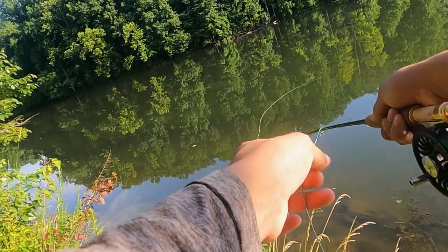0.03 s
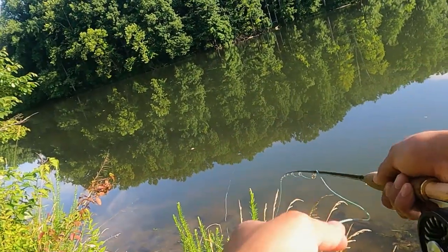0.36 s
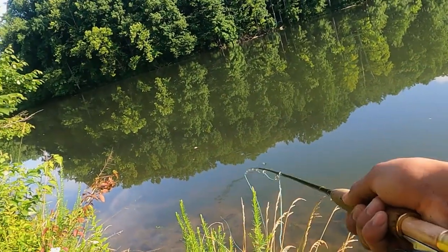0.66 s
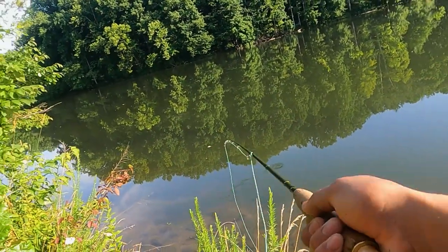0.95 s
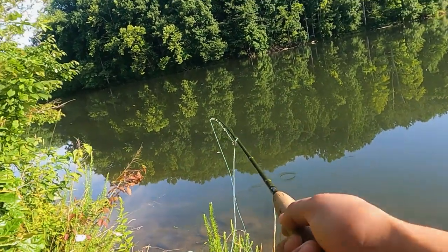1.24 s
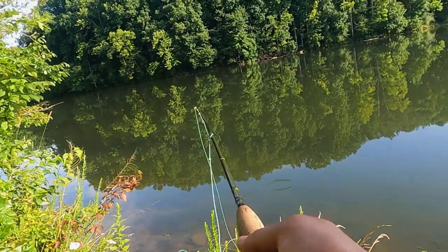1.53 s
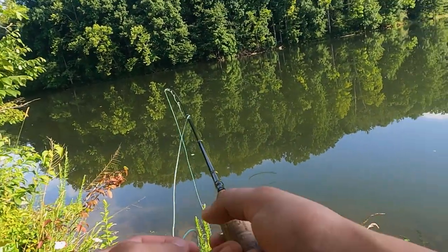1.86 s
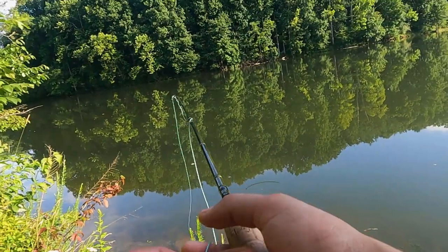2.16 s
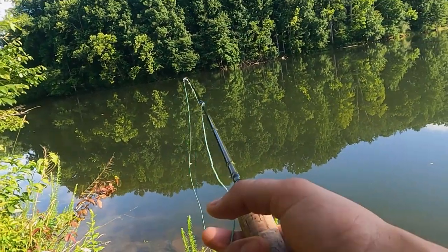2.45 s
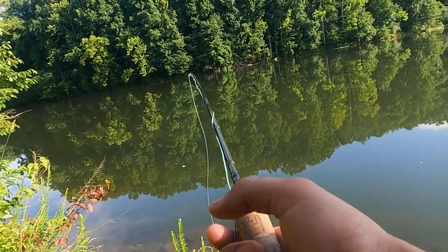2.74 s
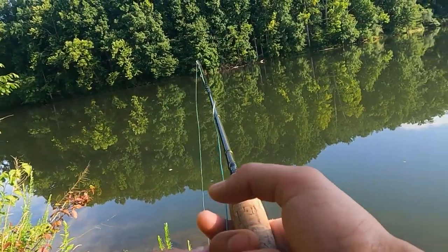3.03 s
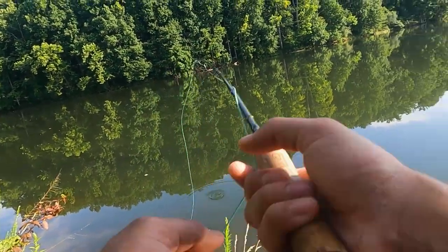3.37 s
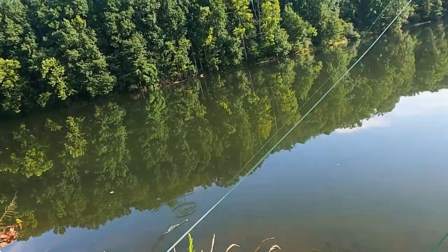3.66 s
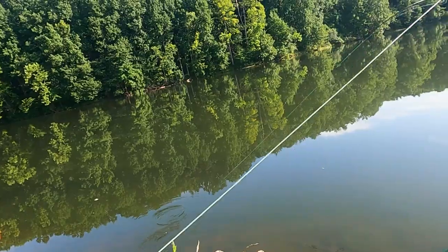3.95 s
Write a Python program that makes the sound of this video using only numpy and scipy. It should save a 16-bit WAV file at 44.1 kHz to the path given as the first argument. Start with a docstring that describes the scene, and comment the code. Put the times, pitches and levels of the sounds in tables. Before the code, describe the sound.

A fishing rod clicks and its line zips out in a cast, over low rumble.

```python
"""Fly rod cast on a lake shore

The line rasps through the rod's guides, sets them ringing and whistles in the air.
Rod, grip and reel click in the hand, close by; a sleeve rustles with the arm.
Behind it: low rumble, a distant hush, a thin band of insects, bird whistles and high chirps."""
import sys
import numpy as np
from scipy import signal
from scipy.fft import rfft, irfft
from scipy.io import wavfile

SR = 44100
rng = np.random.default_rng(int(sys.argv[2]) if len(sys.argv) > 2 else 0)


def file_out(sig):
    """Save sig as 16-bit WAV at sys.argv[1]."""
    # one column per channel
    cols = np.atleast_2d(sig).T
    # limit, then scale
    lim = np.clip(cols, -1, 1)
    pcm = np.round(lim * 32767).astype(np.int16)
    wavfile.write(sys.argv[1], SR, pcm)


N = 176400
T = np.arange(N) / SR

# background spectra: freq_hz, gain_db
RUMBLE_SPECTRUM = [(10, -35.5), (24, -1), (37, 2), (56, 1.5), (75, -5), (108, -12.5), (158, -9.5),
                   (240, -15.5), (380, -41), (650, -42.5)]
DRONE_SPECTRUM = [(60, -17), (110, -6), (155, 4.5), (230, -5.5), (340, -8.5), (430, -23.5), (600, -24),
                  (900, -71.5)]
HUSH_SPECTRUM = [(200, 4), (480, 5), (780, -3.5), (1050, 2.5), (1650, -1.5), (2100, -8), (3000, -18.5),
                 (4500, -26), (7500, -29), (10000, -48), (14000, -66)]
# background levels: time_s, level_db
RUMBLE_LEVEL = [(0, -35), (.7, -32), (2.3, -31), (2.7, -31), (3.5, -32), (3.85, -28), (4, -33)]
DRONE_LEVEL = [(0, -44), (.25, -38.5), (.6, -49.5), (1.25, -41), (1.7, -49), (2.5, -48), (2.95, -38),
               (3.8, -35.5), (4, -37)]
HUSH_LEVEL = [(0, -54), (.7, -50), (4, -50.5)]
HUMP_LEVEL = [(0, -54), (1.3, -55.5), (2, -54.5), (2.4, -63.5), (4, -80)]
# broad hump in the hush: time_s, centre_hz
HUMP_CENTRE = [(0, 935), (1.2, 1000), (2, 1300), (2.7, 1127), (4, 975)]

# falling bird whistles: start_s, length_s, first_hz, last_hz, level_db
BIRD_WHISTLES = [(0.266, 0.14, 2710, 2330, -59), (0.499, 0.21, 2490, 2360, -61.5)]
# high chirps: start_s, length_s, first_hz, top_hz, plunge_hz, level_db
BIRD_CHIRPS = [(1.29, .09, 7050, 8000, 0, -74), (1.995, 0.057, 8170, 8820, 4, -66),
               (2.074, 0.044, 8330, 8700, 2092, -65.5), (2.481, .061, 8340, 8580, 1400, -69.5),
               (2.581, 0.038, 8250, 8740, -2, -66.5), (3.428, 0.033, 8200, 8750, 0, -66),
               (3.505, 0.064, 8500, 8800, 1500, -62.5)]

# line on rod, grip knock and rebound, reel ticks: start_s, level_db
ROD_SNAPS = [(.0423, -49), (.127, -42), (.2588, -50), (2.6152, -20), (2.6774, -46), (3.053, -51.5)]
GRIP_KNOCKS = [(2.9762, -29.5), (2.9802, -45)]
REEL_TICKS = [(.169, -48), (1.738, -51.5), (1.828, -46.5), (3.703, -33), (3.837, -39.5), (3.898, -31.5),
              (3.9322, -45), (3.9852, -37.5)]
# modes of each part: freq_hz, gain_db, t60_s
ROD_MODES = [(1160, -30, 0.037), (1880, -20, 0.028), (2100, -16, 0.0056), (3180, -4.5, 0.0042),
             (4090, -3.5, 0.0091), (5870, -9, 0.0069), (6300, -15, 0.0087)]
GRIP_MODES = [(1050, 3, .011), (1430, -8, .01), (1950, -12, .01), (5100, -11, .006), (6350, -14, .009),
              (7500, -16, .009)]
REEL_MODES = [(3140, -9.5, 0.0047), (5000, -4, 0.0095), (6330, -8, 0.009), (6700, -9.5, 0.011),
              (9730, -16, 0.01)]

# contact and friction spectra: freq_hz, gain_db
CLOTH_SPECTRUM = [(800, -25), (2400, 6.5), (3600, 1.5), (5200, -2), (7400, -7), (9500, -17), (12300, -22.5),
                  (14500, -35)]
CRACK_SPECTRUM = [(700, -35), (1400, -3), (3000, -3.5), (6500, -6), (9000, -15), (13000, -8)]
RASP_SPECTRUM = [(900, -35), (2000, -11), (3200, 1), (3700, -1.5), (4600, 1), (5600, -6), (7500, -12),
                 (10000, -24.5), (12500, -26.5), (15000, -38)]
SCRATCH_SPECTRUM = [(3000, -22), (6000, 0), (7000, 2.5), (8500, -16), (12000, -17), (13500, -30)]
# friction swells: peak_s, half_width_s, level_db
SLEEVE_BRUSHES = [(0.51, 0.26, -66), (0.848, 0.1, -63.5), (1.458, 0.13, -63), (2, 0.09, -64.5),
                  (2.377, 0.044, -62), (2.528, 0.11, -63.5), (3.325, 0.13, -68)]
LINE_TUGS = [(3.778, 0.01, -42.5), (3.822, 0.013, -49.5), (3.871, 0.016, -58.5)]
GUIDE_ZINGS = [(0.048, 0.065, -66.5), (3.52, .045, -57), (3.63, 0.04, -46.5), (3.734, 0.008, -50)]
FINGER_SCRATCHES = [(0.813, 0.061, -67), (1.744, 0.015, -70), (1.773, 0.057, -67)]
# line through the guides, one curve per pull: time_s, level_db
LINE_PULLS = [
    [(0, -63), (.05, -60), (.14, -66.5), (.19, -74)],
    [(2.612, -63), (2.625, -56), (2.7, -56), (2.735, -78)],
    [(3.4, -68), (3.46, -59), (3.53, -48), (3.578, -50), (3.63, -46), (3.705, -48.5), (3.714, -51.5),
     (3.73, -43.5), (3.76, -51)],
]
# line through the air: peak_s, half_width_s, pitch_hz, level_db
LINE_WHISTLES = [(3.754, 0.004, 3590, -50), (3.761, 0.002, 3060, -38), (3.769, .004, 2640, -50)]


def amp(db):
    """Decibels to gain."""
    return 10 ** (np.asarray(db) / 20)


def unit(x):
    """Scale to rms 1."""
    return x / np.sqrt(np.mean(x ** 2) + 1e-20)


def curve(points, **edges):
    """Piecewise-linear control over time."""
    return np.interp(T, *np.transpose(points), **edges)


def colour(x, spectrum):
    """Spectral shaping, steep roll-off above the last point; rms 1."""
    hz = np.fft.rfftfreq(N, 1 / SR) + 1
    points_hz, points_db = np.transpose(spectrum)
    gain = amp(np.interp(np.log(hz), np.log(points_hz), points_db))
    return unit(irfft(rfft(x) * gain / (1 + (hz / points_hz[-1]) ** 10), N))


def noise():
    """Two independent white channels."""
    return rng.standard_normal((2, N))


def wander(rate_hz):
    """Smooth random control; rms 1."""
    lowpass = np.exp(-(np.fft.rfftfreq(N, 1 / SR) / rate_hz) ** 2)
    return unit(irfft(rfft(rng.standard_normal(N)) * lowpass, N))


def place(pair, side_db, pan_db):
    """Mid/side to stereo; positive pan is left."""
    mid, side = pair[0], amp(side_db) * pair[1]
    return np.array([(mid + side) * amp(pan_db / 2), (mid - side) * amp(-pan_db / 2)])


def phase(hz):
    """Running phase in radians."""
    return 2 * np.pi * np.cumsum(hz * np.ones(N)) / SR


def resonate(x, centre_hz, width_hz):
    """Double-pole resonance, movable centre; rms 1."""
    carrier = np.exp(1j * phase(centre_hz))
    pole = np.exp(-np.pi * width_hz / SR)
    return unit((carrier * signal.lfilter([1], [1, -2 * pole, pole ** 2], x / carrier)).real)


def swells(rows):
    """Sum of bell-shaped envelopes."""
    return sum(amp(db) * np.exp(-((T - peak_s) / half_s) ** 2 / np.sqrt(2)) for peak_s, half_s, db in rows)


def decay(t, t60_s):
    """Exponential fall, 60 dB in t60_s."""
    return 1000 ** (-t / t60_s)


def echoes(x, t60_s):
    """Diffuse stereo tail."""
    t = T[:SR // 2]
    tail = rng.standard_normal((2, len(t))) * decay(t, t60_s)
    return signal.fftconvolve(x[None], tail / np.linalg.norm(tail[0]), axes=1)[:, :N]


def shore():
    """Distant rumble, drone and hush; a hump in the hush drifts and fades."""
    rumble = amp(curve(RUMBLE_LEVEL)) * colour(rng.standard_normal(N), RUMBLE_SPECTRUM)
    drone = amp(curve(DRONE_LEVEL)) * place(colour(noise(), DRONE_SPECTRUM), side_db=-34, pan_db=0.5)
    hush_gain = amp(curve(HUSH_LEVEL) + 0.7 * wander(10))
    hush = place(colour(noise(), HUSH_SPECTRUM), side_db=-8, pan_db=3)
    hump_gain = amp(curve(HUMP_LEVEL) + wander(11))
    hump = place(resonate(noise(), curve(HUMP_CENTRE), width_hz=485), side_db=-8.5, pan_db=3.5)
    return rumble + drone + hush_gain * hush + hump_gain * hump


def insects(level_db=-75.5, waver_db=0.76):
    """Thin, near-steady band of noise."""
    gain = amp(level_db + waver_db * wander(40))
    return gain * place(resonate(noise(), centre_hz=5743, width_hz=260), side_db=-21.5, pan_db=-2.5)


def birds(whistle_waver_hz=14, chirp_flutter_db=2.5):
    """Falling whistles and rising chirps, some ending in a plunge; trees echo both."""
    whistles, chirps = np.zeros(N), np.zeros(N)
    chirp_waver = 1 + 0.009 * wander(200)
    for start_s, length_s, first_hz, last_hz, db in BIRD_WHISTLES:
        progress = np.clip((T - start_s) / length_s, 0, 1)
        pitch_hz = last_hz + (first_hz - last_hz) * (1 - progress) ** 1.4
        pitch_hz += whistle_waver_hz * wander(24)
        whistles += amp(db) * np.sin(np.pi * progress) * np.sin(phase(pitch_hz))
    for start_s, length_s, first_hz, top_hz, plunge_hz, db in BIRD_CHIRPS:
        progress = np.clip((T - start_s) / length_s, 0, 1)
        climb_hz = first_hz + (top_hz - first_hz) * np.sin(np.pi * progress / 2)
        pitch_hz = (climb_hz - plunge_hz * progress ** 6) * chirp_waver
        chirps += amp(db) * np.sqrt(abs(np.sin(np.pi * progress))) * np.sin(phase(pitch_hz))
    chirps *= amp(chirp_flutter_db * wander(120))
    return whistles + chirps + echoes(amp(-10) * whistles + amp(0.5) * chirps, t60_s=0.46)


def sleeve(grain_db=1.2):
    """Cloth brushes as the arm moves: soft, grainy hiss."""
    hiss = colour(noise() * amp(grain_db * wander(360)), CLOTH_SPECTRUM)
    return place(hiss, side_db=-3, pan_db=5) * swells(SLEEVE_BRUSHES)


def strikes(hits, modes, pan_db, crack_db, echo_db, echo_t60_s):
    """Each contact cracks and rings one part's modes; nearby surfaces scatter it."""
    out = np.zeros(N)
    grit = colour(rng.standard_normal(N), CRACK_SPECTRUM)
    for start_s, db in hits:
        start = round(start_s * SR)
        hit = out[start:][:SR // 10]
        t = T[:len(hit)]
        hit += amp(db + crack_db) * decay(t, t60_s=0.029) * grit[start:][:len(t)]
        for hz, mode_db, t60_s in modes:
            detune = 1 + 0.014 * rng.standard_normal()
            hit += amp(db + mode_db) * decay(t, t60_s) * np.sin(2 * np.pi * hz * detune * t)
    band_hz = [750, 9260]  # the clicks carry little below 750 Hz; soft contact dulls the top
    out = signal.lfilter(*signal.butter(2, band_hz, "bandpass", fs=SR), out)
    return (out + amp(echo_db) * echoes(out, echo_t60_s)) * amp([[pan_db / 2], [-pan_db / 2]])


def tackle_clicks():
    """Line snaps on the rod, woody grip knocks, metal reel ticks."""
    rod = strikes(ROD_SNAPS, ROD_MODES, pan_db=-1.5, crack_db=-29.5, echo_db=-6.5, echo_t60_s=0.049)
    grip = strikes(GRIP_KNOCKS, GRIP_MODES, pan_db=0, crack_db=-14, echo_db=-5, echo_t60_s=0.21)
    reel = strikes(REEL_TICKS, REEL_MODES, pan_db=-1.5, crack_db=-14.5, echo_db=-6, echo_t60_s=0.071)
    return rod + grip + reel


def line_whistles(fall_per_s=5.1, wobble=0.0138):
    """The whipping line sheds vortices: brief falling tones."""
    out = np.zeros(N)
    for peak_s, half_s, hz, db in LINE_WHISTLES:
        pitch_hz = hz * (1 - fall_per_s * (T - peak_s) + wobble * wander(275))
        out += swells([(peak_s, half_s, db)]) * np.sqrt(2) * np.sin(phase(pitch_hz))
    return out


def line_friction(slips_per_s=5700, ring_db=-10.5, flutter_db=1.5):
    """Tiny slips of the line scrape and ring the guides and scratch over the fingers."""
    pull = sum(amp(curve(points, left=-np.inf, right=-np.inf)) for points in LINE_PULLS)
    pull += swells(LINE_TUGS)
    slips = noise() * (rng.random(N) < slips_per_s / SR)
    rasp = place(colour(slips, RASP_SPECTRUM), side_db=-6.5, pan_db=-1)
    ring_hz = 3840 * (1 + 0.035 * wander(57))
    ring = place(resonate(slips, ring_hz, width_hz=500), side_db=-20, pan_db=-4)
    zing = place(resonate(slips, centre_hz=4170, width_hz=520), side_db=-20, pan_db=-4)
    rough_slips = slips * amp(3.5 * wander(180))
    scratch = place(colour(rough_slips, SCRATCH_SPECTRUM), side_db=-7, pan_db=1)
    slide = pull * amp(flutter_db * wander(60)) * (rasp + amp(ring_db) * ring)
    return slide + zing * swells(GUIDE_ZINGS) + scratch * swells(FINGER_SCRATCHES)


def scene():
    """Stereo mix; rod slightly right, sleeve left."""
    return shore() + insects() + birds() + sleeve() + tackle_clicks() + line_whistles() + line_friction()


def record(dry):
    """Steep low-pass band limit."""
    cutoff_hz = 14900
    lowpass = signal.firwin(511, cutoff_hz, window=("kaiser", 9), fs=SR)
    return signal.oaconvolve(dry, lowpass[None], "same")


dry = scene()
out = record(dry)
file_out(out)
```